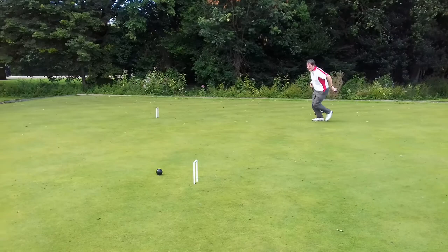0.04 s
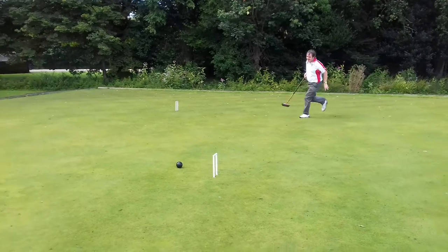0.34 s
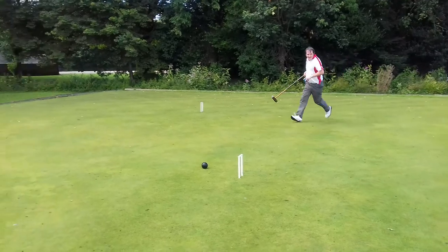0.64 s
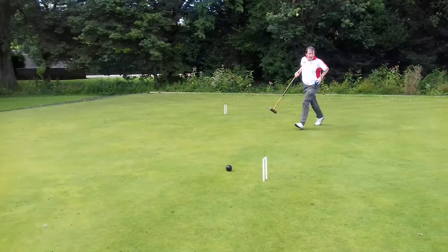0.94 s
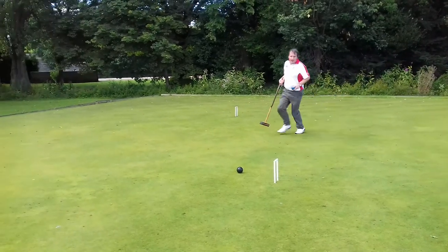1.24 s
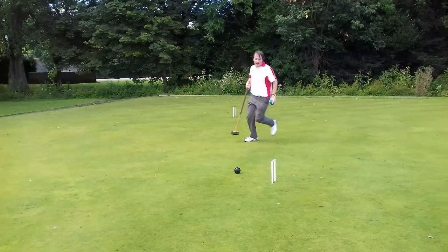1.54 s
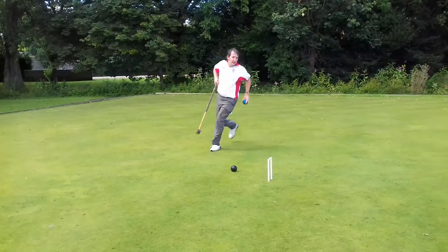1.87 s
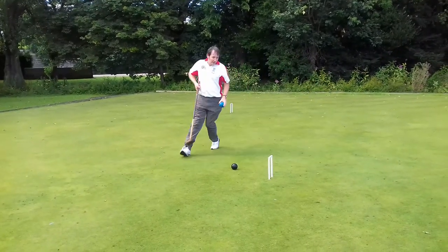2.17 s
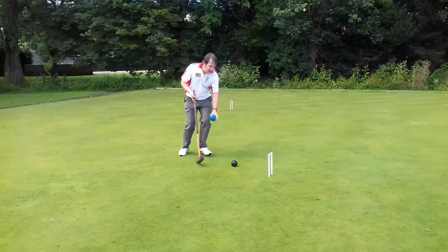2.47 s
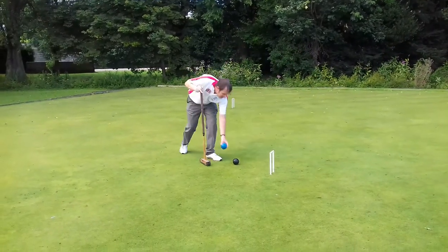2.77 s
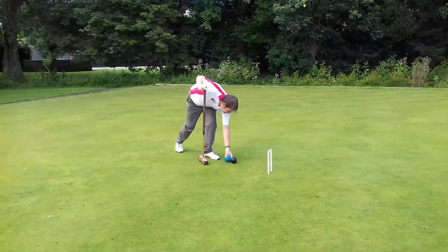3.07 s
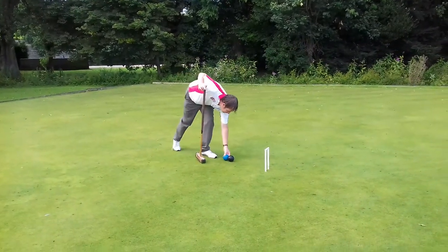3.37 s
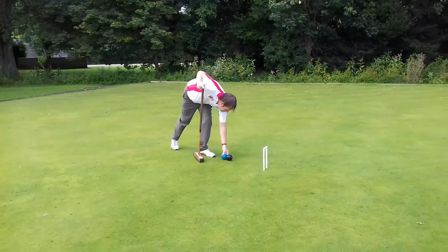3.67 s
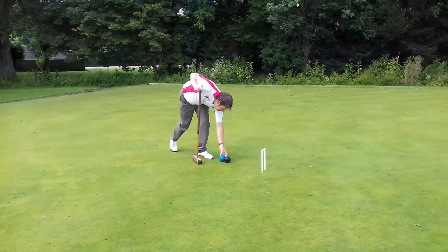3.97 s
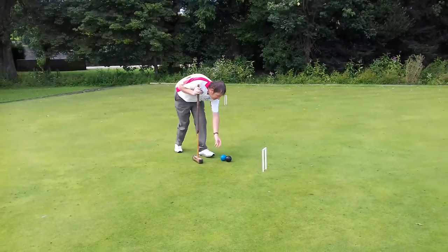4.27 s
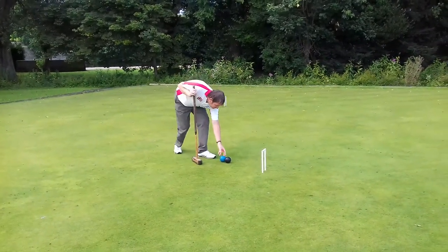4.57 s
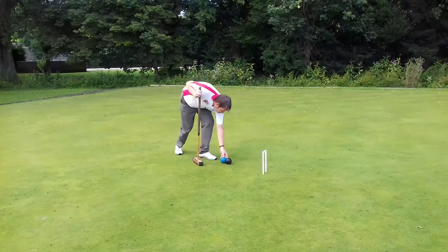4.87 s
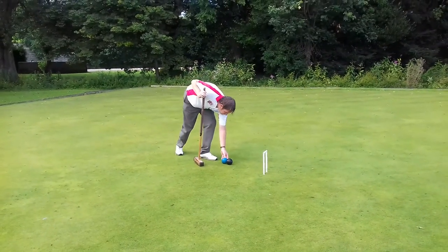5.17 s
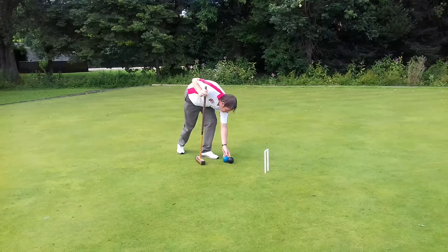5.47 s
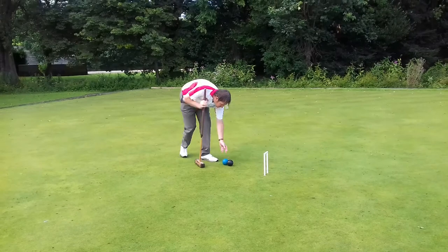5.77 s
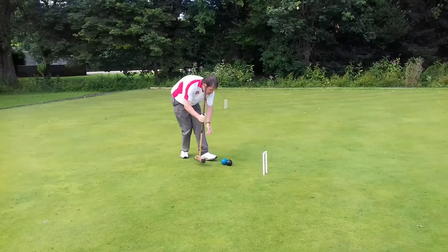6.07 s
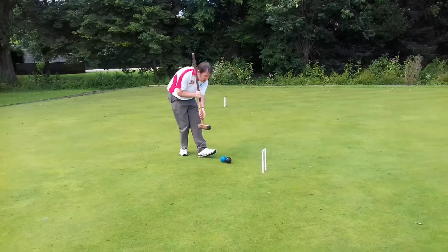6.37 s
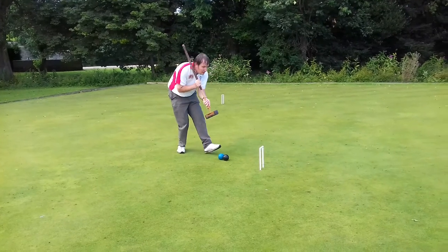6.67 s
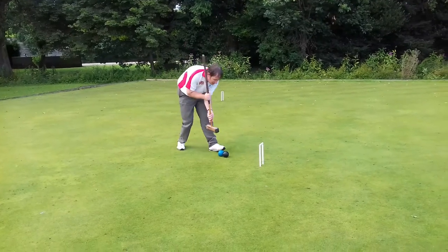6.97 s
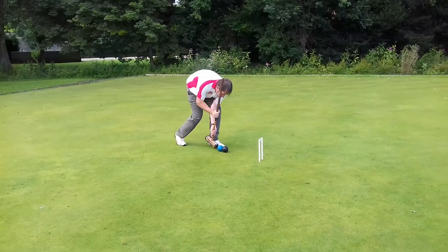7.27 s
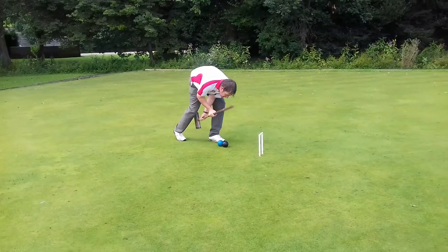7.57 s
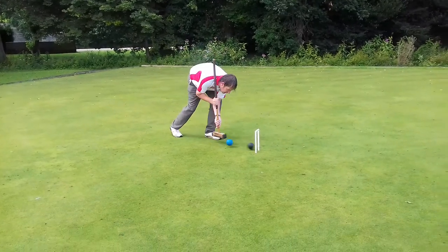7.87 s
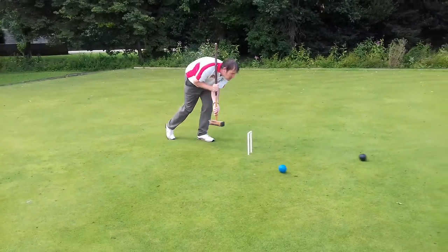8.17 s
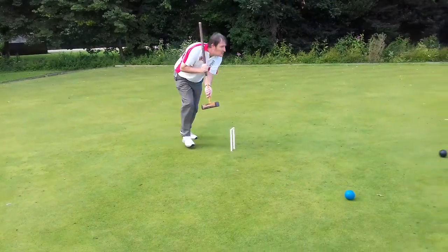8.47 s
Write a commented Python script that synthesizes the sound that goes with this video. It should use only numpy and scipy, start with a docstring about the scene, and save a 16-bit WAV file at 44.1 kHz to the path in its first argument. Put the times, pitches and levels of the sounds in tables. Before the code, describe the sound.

Leaves hiss and a distant engine idles, then revs as a croquet mallet sharply knocks the balls and one clanks off an iron hoop.

```python
"""Croquet on a tree-ringed lawn

Leaves hiss in a dying breeze. Far off, the exhaust puffs of a big eight-cylinder engine ring its pipe:
it idles, turns abruptly louder and revs up at the end. After one soft footfall the mallet knocks the
balls; a tenth of a second later one glances off the iron hoop, and the tree line echoes the stroke."""
import sys
import numpy as np
from scipy import signal
from scipy.fft import rfft, irfft
from scipy.io import wavfile
from scipy.ndimage import uniform_filter1d, minimum_filter1d

SR = 44100
rng = np.random.default_rng(int(sys.argv[2]) if len(sys.argv) > 2 else 0)


def pcm_store(signal):
    """Save signal as 16-bit PCM."""
    levels = np.round(np.clip(np.atleast_2d(signal), -1, 1) * 32767)
    wavfile.write(sys.argv[1], SR, levels.astype(np.int16).T)


N = 384552
TIME = np.arange(N) / SR

# fader ride of the dying breeze: t/s, hiss level/dB, relative rustle level/dB
BREEZE_FADE = [(0.0, -44.5, -46), (0.24, -44, -46.5), (1.94, -45, -45.5), (2.45, -45.5, -46.5),
               (3.71, -45, -48.5), (5.33, -49, -53), (7.13, -49.5, -54.5), (7.85, -50, -56)]
# tone of the foliage: f/Hz, relative level/dB
LEAF_SPECTRUM = [(150, -11), (350, -12.5), (550, -7), (850, 0.5), (1200, 1), (1750, -0.5), (2100, -5),
                 (3000, -9), (4100, -5.5), (4500, -11.5), (5000, -21.5), (6000, -32), (8000, -40.5),
                 (12000, -59)]
# each cylinder's puff, in firing order: relative level/steps (engine() sets the dB per step)
PUFF_ACCENTS = [-5, -12, -9.5, -5.5, -8, -7, -19, -20]
# exhaust pipe resonances: f/Hz, width/Hz, relative idle level/dB, change at full revs/dB
PIPE_MODES = [(71, 27, -14, -19), (117.6, 35, 4, -5), (131, 34.5, 1.5, 8.5), (193.6, 60, -9, 8.5),
              (251, 60, -9.5, -10), (305, 33, -13.5, 20), (536, 410, -8, -11)]
# a shoe on turf: t/s, relative level/dB
FOOTFALL = [(6.7733, -34)]
# knocks on a ball, with a light nudge just before the last: t/s, relative level/dB, brightness f/Hz
BALL_KNOCKS = [(7.9143, -0.5, 5900), (8.0022, -24, 900), (8.0055, -3, 990)]
# body of the ball: f/Hz, relative level/dB, t60/s
BALL_MODES = [(328, -51, 0.0077), (697, 1, 0.011), (850, 2, 0.0079), (1440, -9.5, 0.015),
              (2130, -12, 0.0092), (2950, -21, 0.01), (3680, -6, 0.0082), (4160, -4.5, 0.014),
              (4860, -17, 0.0087)]
# the ball clips the hoop: t/s, relative level/dB
HOOP_HITS = [(8.0065, 1.5)]
# ring of the iron hoop: f/Hz, relative level/dB, t60/s
HOOP_MODES = [(1860, -31, .07), (2114, -32, .04), (2990, -41, .05), (3343, -44, .07), (4090, -29, .03),
              (4468, -14, .075), (4520, -17, .035), (4755, -35, .06), (5434, -39, .04), (5561, -39, .055),
              (5925, -34, .055), (6385, -47, .08), (7687, -45, .083), (8027, -44, .072), (9680, -55, .06),
              (10965, -57, .06), (11287, -56, .055), (11540, -48, .058), (13183, -58, .06),
              (13860, -60, .05)]
# tone of the contact transient: f/Hz, relative level/dB
CRACK_SPECTRUM = [(1000, 10), (5500, 6.5), (7000, -9), (9000, -16), (11000, -34), (15000, -30)]
# tone of the sound the trees scatter back: f/Hz, relative level/dB
ECHO_SPECTRUM = [(200, -32), (600, -32.5), (1400, -18), (3000, -19), (4500, -30), (6000, -23), (7900, -20),
                 (11000, -21), (16000, -36)]
# faint background hiss, strongest in the low mids, as EQ on white noise: f/Hz, level/dB
HISS_SPECTRUM = [(100, -68.5), (500, -58), (2000, -67), (4500, -70.5), (8000, -71), (15000, -70)]


def from_db(db):
    """Decibels to gain."""
    return 10 ** (np.asarray(db) / 20)


def unit_rms(x):
    """Scale to unit power."""
    return x / np.sqrt(np.mean(x ** 2) + 1e-20)


def cut(x, kind, hz, order=2):
    """Butterworth low- or high-pass."""
    return signal.sosfilt(signal.butter(order, hz, kind, fs=SR, output="sos"), x + 1e-18)


def colour(x, spectrum):
    """EQ a signal with a curve of f/Hz, level/dB."""
    hz, db = np.transpose(spectrum)
    bins = np.maximum(np.fft.rfftfreq(len(x), 1 / SR), 1)
    gain = from_db(np.interp(np.log(bins), np.log(hz), db))
    return irfft(rfft(x) * gain, len(x))


def drift(hz):
    """Random modulator with a spread of one, moving mostly slower than hz."""
    hop, run_in = 40, 2000
    r = np.exp(-2 * np.pi * hz * hop / SR)
    white = rng.standard_normal(N // hop + run_in + 2)
    slow = signal.lfilter([1], [1, -2 * r, r * r], white)[run_in:]
    return np.interp(np.arange(N) / hop, np.arange(len(slow)), unit_rms(slow))


def click(s, db):
    """One impulse at time s."""
    return from_db(db) * (np.arange(N) == round(s * SR))


def ring(blow, modes):
    """Decaying sines set off by a blow; neighbouring modes alternate in polarity."""
    out = np.zeros(N)
    for k, (hz, db, t60) in enumerate(modes):
        r, w = 10 ** (-3 / (t60 * SR)), 2 * np.pi * hz / SR
        mode = signal.lfilter([0, np.sin(w)], [1, -2 * r * np.cos(w), r * r], blow + 1e-18)
        out += (-1) ** k * from_db(db) * mode
    return out


def resonate(x, hz, width):
    """Resonant band-pass with unity gain at its peak."""
    r, w = np.exp(-np.pi * width / SR), 2 * np.pi * hz / SR
    return signal.lfilter(np.array([1, 0, -1]) * (1 - r * r) / 2, [1, -2 * r * np.cos(w), r * r], x + 1e-18)


def leaves(split_hz=2050, rustle_trim_db=1.0, flutter_db=0.29, swell_db=0.6):
    """Distant foliage blurs into a bed of hiss; the fine rustle on top fades faster as the breeze drops."""
    times, hiss_points, rustle_points = np.transpose(BREEZE_FADE)
    hiss = cut(colour(rng.standard_normal(N), LEAF_SPECTRUM), "low", split_hz, order=6)
    hiss = cut(hiss, "high", hz=110)
    rustle = cut(colour(rng.standard_normal(N), LEAF_SPECTRUM), "high", split_hz, order=6)
    hiss_db = np.interp(TIME, times, hiss_points) + flutter_db * drift(hz=4.1) + swell_db * drift(hz=0.74)
    rustle_db = np.interp(TIME, times, rustle_points) + rustle_trim_db + flutter_db * drift(hz=28.0)
    return unit_rms(hiss) * from_db(hiss_db) + unit_rms(rustle) * from_db(rustle_db)


def throttle(idle_hz=11.68, top_hz=25.05, top_s=8.15, rise_s=0.372, sag_hz_per_s=2.7,
             labour_hz=0.72, labour_at_s=5.33, labour_s=0.44):
    """Firing cycles per second and share of full revs: the idle labours briefly, revs up, then sags."""
    labour = np.exp(-((TIME - labour_at_s) / labour_s) ** 2)
    revved = np.exp(-(np.minimum(TIME - top_s, 0) / rise_s) ** 2)
    sag = sag_hz_per_s * np.maximum(TIME - top_s, 0)
    return idle_hz - labour_hz * labour + (top_hz - idle_hz) * revved - sag, revved


def engine_fader(revved, faint_db=-60.5, loud_db=-50.5, jump_s=3.405, surge_db=2.8, settle_s=0.2,
                 rev_db=6.5):
    """Engine gain: faint at first, a jump with a surge that settles, then a lift with the revs."""
    surge = surge_db * np.exp(-np.maximum(TIME - jump_s, 0) / settle_s)
    idle_db = np.where(TIME < jump_s, faint_db, loud_db + surge)
    return from_db(idle_db + rev_db * revved)


def engine(scatter_db=0.5, gas_noise=0.012, gas_s=0.042, steadying=0.51):
    """Uneven exhaust puffs ring the pipe: a lumpy lope at idle, a steadier, higher drone at speed."""
    cycle_hz, revved = throttle()
    rough = 1 - steadying * revved
    firing = np.floor(np.cumsum(cycle_hz) / SR * len(PUFF_ACCENTS)).astype(int)
    at = np.flatnonzero(np.diff(firing)) + 1
    db_per_step = 6 - 0.21 * revved[at]  # the cylinders even out slightly at speed
    accent_db = np.array(PUFF_ACCENTS)[firing[at] % len(PUFF_ACCENTS)] * db_per_step
    puffs = np.zeros(N)
    puffs[at] = from_db(accent_db + scatter_db * rough[at] * rng.standard_normal(len(at)))
    # each soft-edged puff trails a short rush of turbulent gas
    rush = signal.lfilter([1], [1, -np.exp(-1 / (gas_s * SR))], puffs)
    flow = cut(puffs, "low", hz=333, order=4) + gas_noise * rough * rush * rng.standard_normal(N)
    pipe = sum(from_db(db + change_db * revved) * resonate(flow, hz, width)
               for hz, width, db, change_db in PIPE_MODES)
    # the deep thud of the lope fades at speed
    pipe = (1 - revved) * cut(pipe, "high", hz=48, order=3) + revved * cut(pipe, "high", hz=92, order=4)
    pipe = cut(pipe, "low", hz=800)
    running_rms = np.sqrt(uniform_filter1d(pipe ** 2, size=SR // 3) + 1e-20)
    return engine_fader(revved) * pipe / running_rms


def footfall(pat_hz=494, pat_db=4, t60=0.008):
    """A shoe lands on the turf with one soft, damped pat."""
    blow = sum(click(s, db) for s, db in FOOTFALL)
    return resonate(ring(blow, [(pat_hz, pat_db, t60)]), hz=520, width=700)


def crack(s, db, t60):
    """A splinter of noise where hard surfaces meet."""
    age = np.maximum(TIME - s, 0)
    burst = rng.standard_normal(N) * (age > 0) * 10 ** (-3 * age / t60)
    return from_db(db) * cut(colour(burst, CRACK_SPECTRUM), "high", hz=110)


def ball_knocks(snap_db=-24, snap_t60=0.013):
    """Each blow rings the ball with a dry knock; a softer contact is duller and has less snap."""
    blows = sum(cut(click(s, db), "low", hz, order=1) for s, db, hz in BALL_KNOCKS)
    body = cut(ring(blows, BALL_MODES), "low", hz=5230, order=4)
    body = cut(body, "high", hz=300, order=1)  # a small ball radiates little bass
    hardest = max(hz for s, db, hz in BALL_KNOCKS)
    snaps = sum(hz / hardest * crack(s, db + snap_db, snap_t60) for s, db, hz in BALL_KNOCKS)
    return body + snaps


def hoop(clank_db=-27, clank_t60=0.035):
    """The ball glances off the iron hoop: a noisy clank over a short, bright ring."""
    return sum(ring(click(s, db), HOOP_MODES) + crack(s, db + clank_db, clank_t60) for s, db in HOOP_HITS)


def tree_line(x, predelay_s=0.092, swell_s=0.021, t60=0.51, return_db=2.0):
    """Countless trunks and branches send back a late, smooth echo that swells and dies."""
    age = np.maximum(TIME[:SR] - predelay_s, 0)
    envelope = (1 - np.exp(-age / swell_s)) * 10 ** (-3 * age / t60)
    echo = colour(rng.standard_normal(SR), ECHO_SPECTRUM) * envelope / np.sqrt(np.sum(envelope ** 2))
    return from_db(return_db) * signal.fftconvolve(x, echo)[:N]


def limit(x, ceiling=0.93, window_s=0.0007):
    """Duck the gain smoothly around any peak above the ceiling."""
    size = int(window_s * SR)
    gain = ceiling / np.maximum(np.abs(x).max(axis=0), ceiling)
    return x * uniform_filter1d(minimum_filter1d(gain, size=size), size=size)


def scene():
    """All layers sit dead centre; only the stroke feeds the echo."""
    stroke = ball_knocks() + hoop()
    mix = leaves() + engine() + footfall() + stroke + tree_line(stroke)
    return np.tile(mix, (2, 1))


def record(dry):
    """Faint background hiss, separate in each channel, then a limiter and a steep top cut."""
    hiss = np.array([colour(white, HISS_SPECTRUM) for white in rng.standard_normal((2, N))])
    top_cut = signal.ellip(10, 0.1, 70, 15800, fs=SR, output="sos")
    return signal.sosfilt(top_cut, limit(dry + hiss))


dry = scene()
out = record(dry)
pcm_store(out)
```